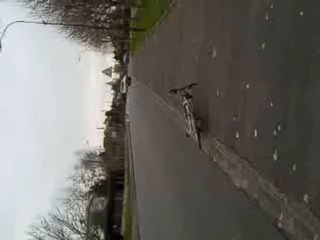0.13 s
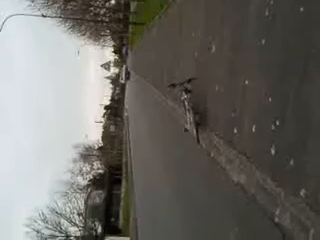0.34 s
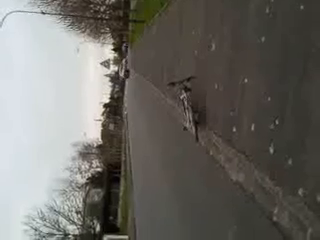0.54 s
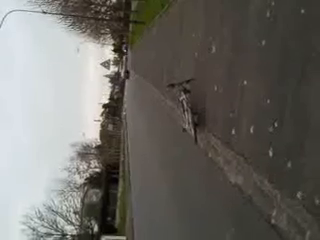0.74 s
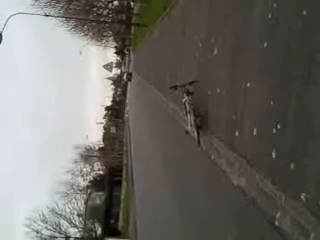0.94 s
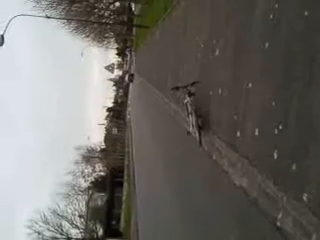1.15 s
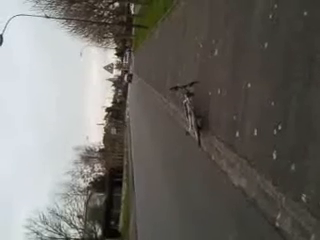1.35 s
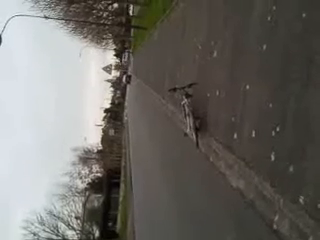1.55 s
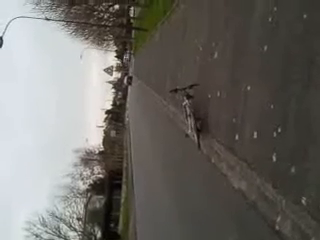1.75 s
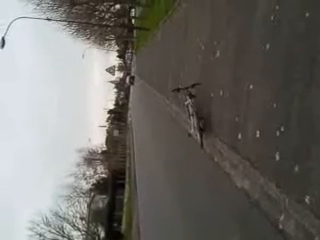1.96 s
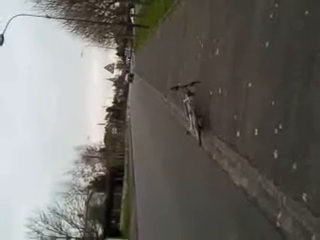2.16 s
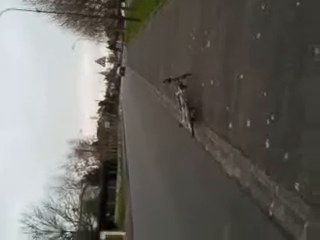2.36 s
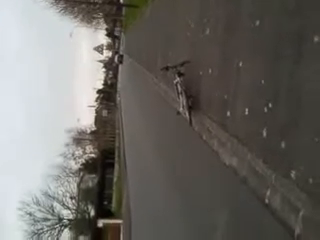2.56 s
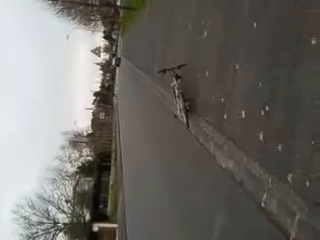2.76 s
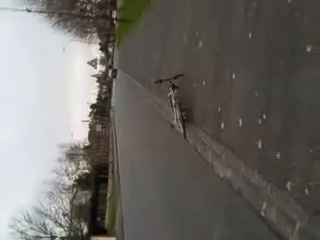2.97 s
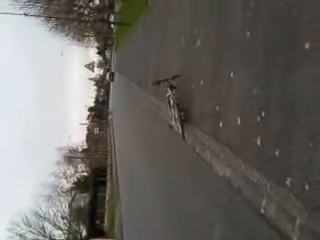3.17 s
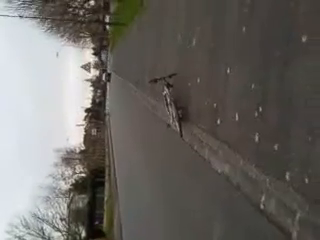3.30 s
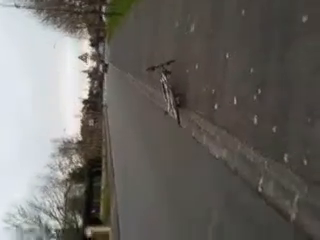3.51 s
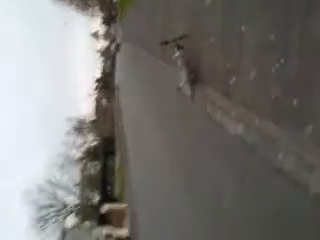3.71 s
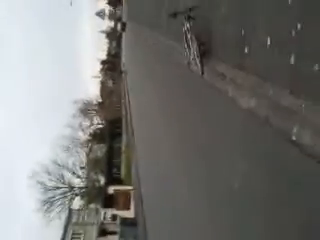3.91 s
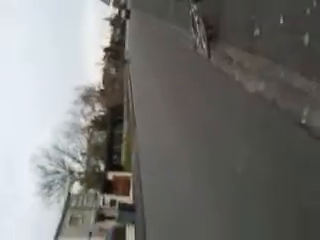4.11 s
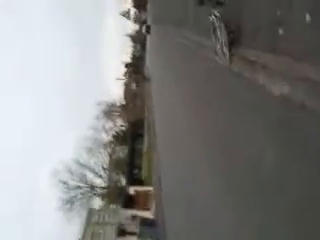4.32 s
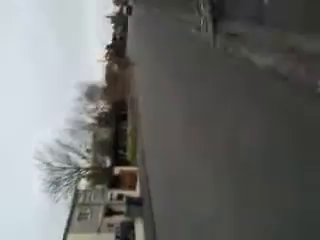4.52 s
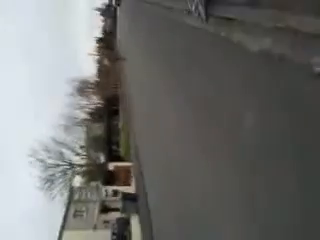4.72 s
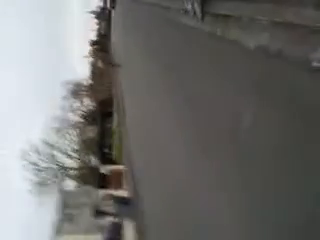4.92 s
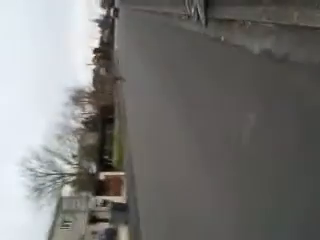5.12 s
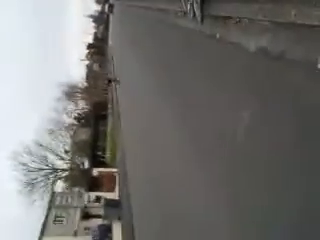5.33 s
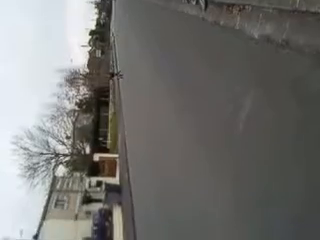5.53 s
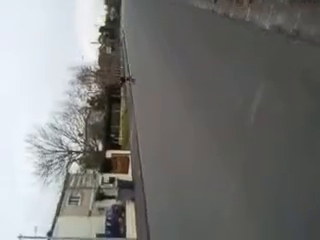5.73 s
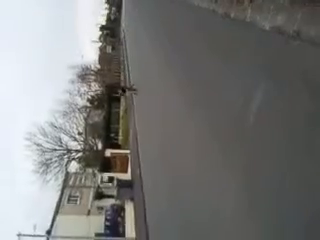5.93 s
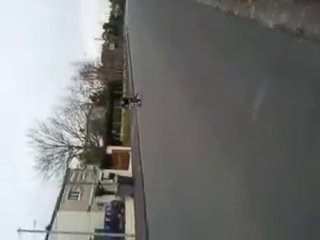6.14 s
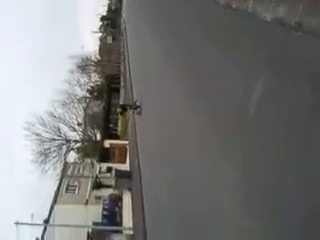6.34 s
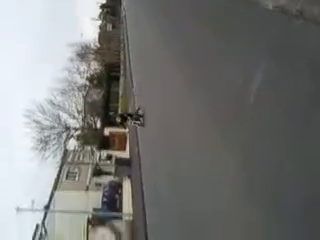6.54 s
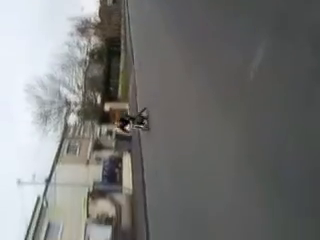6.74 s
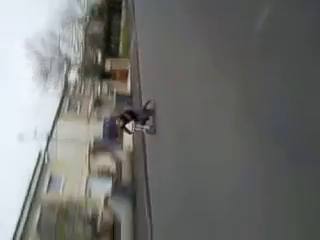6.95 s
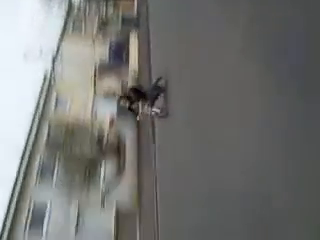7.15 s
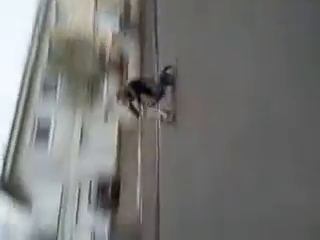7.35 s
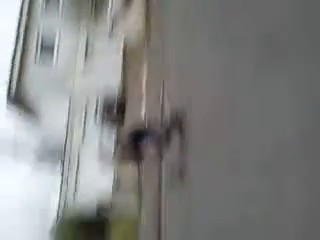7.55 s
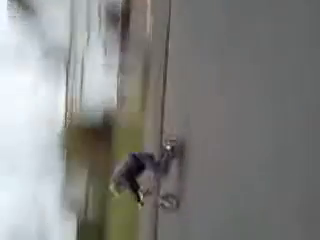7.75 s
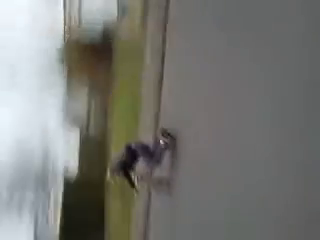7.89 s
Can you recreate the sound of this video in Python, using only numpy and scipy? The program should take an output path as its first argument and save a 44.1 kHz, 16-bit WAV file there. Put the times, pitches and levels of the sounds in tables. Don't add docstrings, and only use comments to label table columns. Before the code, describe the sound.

Outdoors on a residential street, a tiny two-stroke bike starts far off and accelerates nearer, its nasal exhaust buzz rising in pitch. A duller second engine idles, blips twice and winds down. The bike grows loud and tinny, stutters briefly on a lifted throttle, then rasps past with its pitch dropping slightly. Soft wind rumble and faint house echoes; narrow, telephone-like phone sound, distorting on loud firings.

```python
import sys
import numpy as np
from scipy import signal
from scipy.fft import rfft, irfft, next_fast_len
from scipy.io import wavfile

SR = 44100
rng = np.random.default_rng(int(sys.argv[2]) if len(sys.argv) > 2 else 0)


def inscribe(sig):
    pcm = np.round(np.clip(np.atleast_2d(sig).T, -1, 1) * 32767)
    wavfile.write(sys.argv[1], SR, pcm.astype(np.int16))


def ratio(d):
    e = np.asarray(d, float) / 20
    return 10 ** e


N = 355887


def evened(x):
    return x / np.sqrt(np.mean(x ** 2) + 1e-20)


def columns(rows):
    times, *values = np.transpose(rows)
    return [np.interp(np.arange(N) / SR, times, value) for value in values]


def ramp(start_s, takes_s):
    return np.clip((np.arange(N) / SR - start_s) / takes_s, 0, 1)


def bumps(rows):
    t = np.arange(N) / SR
    return sum(np.interp(t, [s - rise, s, s + fall], [0, size, 0]) for s, rise, fall, size in rows)


def wander(per_s):
    t = np.arange(N) / SR * per_s
    steps = rng.standard_normal(600)
    return np.interp(t, np.arange(len(steps)), steps) * np.sqrt(3 / 2)


def coloured(x, points):
    f, db = np.transpose(points)
    size = next_fast_len(len(x) + 4096)
    hz = np.fft.rfftfreq(size, 1 / SR)
    gain = ratio(np.interp(np.log(hz + 1), np.log(f + 1), db))
    return irfft(rfft(x, size) * gain, size)[:len(x)]


def resonate(x, hz, width):
    turn = np.exp(2j * np.pi * np.cumsum(hz * np.ones(N)) / SR)
    r = np.exp(-np.pi * width / SR)
    smooth = signal.lfilter([(1 - r) ** 2], [1, -2 * r, r * r], x / turn)
    return 2 * (turn * smooth).real


def focused(x, hz, focus, wide, narrow):
    focus = np.clip(focus, 0, 1)
    blurred = evened(resonate(x, hz, wide))
    sharp = evened(resonate(x, hz, narrow))
    return evened((1 - focus) * blurred + focus * sharp)


def body(x, modes):
    total = 0
    for k, (hz, width, db) in enumerate(modes):
        total = total + (-1) ** k * ratio(db) * resonate(x, hz, width)
    return evened(total)


def firings(hz, memory, spread_db, blowdown, jitter, catches=(), count=128):
    turns = np.cumsum(hz) / SR
    at = [round(s * SR) for s, db in catches]
    turns += 1 - (turns[at[0]] % 1 if at else 0)
    chance = rng.standard_normal((1200, count + 2))
    strength = ratio(spread_db * chance[:, -1])
    for k, (s, db) in zip(at, catches):
        strength[round(turns[k])] = ratio(db)
    phase = np.arange(count) / count
    bang = np.sinc(count * (phase - .04 - jitter * chance[:, -2:-1])) * strength[:, None]
    keep = np.clip(memory, 0, .95)
    gas = signal.lfilter([1], [1, -keep], chance[:, :count], axis=0)
    gas *= (0.19 + np.exp(-phase / blowdown)) * strength[:, None]
    place = (turns + 0.037) * count
    return [evened(np.interp(place, np.arange(c.size), c.ravel())) for c in (bang, gas)]


def mixed(bang, gas, rough):
    rough = np.clip(rough, 0, 1)
    return np.sqrt(1 - rough) * bang + np.sqrt(rough) * gas


# (frequency [Hz], width [Hz], level [dB])
PIPE_SKIRTS = [(835, 660, 7), (1280, 630, 6.5)]
PIPE_HZ, PIPE_ABEAM_HZ = 1001, -100
DIP_HZ, DIP_PAST_HZ, LIFT_HZ, LIFT_PAST_HZ = 573, 727, 420, 550


def pipe_note(drive, abeam, past, close, lifted):
    hz = PIPE_HZ + PIPE_ABEAM_HZ * abeam * (1 - past) - 30 * past + 90 * ramp(7.8, .25) + 30 * wander(5)
    focus = 0.02 + 0.36 * ramp(4.9, 0.38) + 0.46 * lifted + 0.061 * close
    focus = focus - 0.52 * abeam + .6 * past + 0.041 * wander(5.6)
    note = focused(drive, hz, focus, wide=620, narrow=260)
    dip_hz = DIP_HZ + (DIP_PAST_HZ - DIP_HZ) * past
    lift_hz = LIFT_HZ + (LIFT_PAST_HZ - LIFT_HZ) * past
    skirts = ratio(-16.0) * body(drive, PIPE_SKIRTS)
    pipe = note + skirts - ratio(-26 + 7 * past) * evened(resonate(drive, lift_hz, 280))
    depth = np.clip(0.27 + .2 * abeam + 0.14 * past, 0, 1)
    return evened(pipe - depth * resonate(pipe, dip_hz, 150))


# (multiple of the firing rate, width [Hz], level [dB])
THUMP_ORDERS = [(1, 212, 17), (2, 510, -3.5)]
# (time [s], fall [s], recovery [s], level [dB])
ECHO_FADES = [(1.3, 0.32, 0.9, -4.5), (1.88, 0.069, 0.22, -21), (2.31, 0.058, .08, -34.5),
              (2.6, 0.12, 0.028, -4), (4.25, 0.15, .19, -10), (4.84, .05, 0.15, -6.5),
              (5.55, .15, 0.23, -9.5), (5.91, 0.073, 0.12, -8.5), (6.5, 0.24, 0.28, -13),
              (7.03, 0.15, .1, -17), (7.62, 0.06, 0.19, -10.5)]
THUMP_DB, THUMP_ABEAM_DB, THUMP_PER_DB = -9.5, 2.5, -0.27


def thump(bang, gas, rough, hz, near_db, abeam, close):
    level_db = THUMP_DB + THUMP_ABEAM_DB * abeam + THUMP_PER_DB * np.maximum(near_db + 33.5, 0)
    level_db = level_db + 4 * close + bumps(ECHO_FADES) + 1.4 * wander(13)
    orders = [(k * hz, width, db) for k, width, db in THUMP_ORDERS]
    return ratio(level_db) * body(mixed(bang, gas, 0.81 * rough), orders)


# (frequency [Hz], width [Hz], level [dB])
OVERTONE_SKIRTS = [(1594, 216, 35.5), (1990, 1500, -25.5)]
# (time [s], rise [s], fall [s], level [dB])
OVERTONE_SWELLS = [
    (2.4, 0.51, 2.3, 6),
    (4.199, 1.8, 0.25, 5.9),
    (4.75, 0.76, .7, 4.5),
    (6.7, .06, 0.44, 3.8),
]
OVERTONE_HZ, OVERTONE_TURNED_HZ, OVERTONE_DRIFT_HZ = 1744, -130, 22
OVERTONE_DB, OVERTONE_PER_DB, OVERTONE_FLICKER_DB = -7.5, -0.38, 1.2


def pipe_overtone(bang, gas, rough, near_db, turned, lifted):
    level_db = OVERTONE_DB + OVERTONE_PER_DB * (near_db + 34) + bumps(OVERTONE_SWELLS)
    level_db = level_db - 6 * lifted + OVERTONE_FLICKER_DB * wander(16)
    hz = OVERTONE_HZ + OVERTONE_TURNED_HZ * (turned - 0.83 * ramp(5.2, 0.57))
    hz = hz + OVERTONE_DRIFT_HZ * wander(4.3)
    hiss = mixed(bang, gas, 1.1 * rough)
    note = evened(resonate(hiss, hz, 130))
    return ratio(level_db) * evened(note + ratio(-.8) * body(hiss, OVERTONE_SKIRTS))


# (time [s], rise [s], fall [s], level [dB])
ECHO_SWELLS = [(1.69, 0.032, 0.09, 1.5), (4.4, 0.17, .15, -2), (5.4, .2, 0.19, 1), (5.79, 0.019, 0.046, 1),
               (5.5, .06, .08, 1.5), (5.68, 0.044, 0.053, 3), (5.89, .07, 0.046, 3),
               (6.07, 0.045, 0.09, 0.5), (6.24, 0.046, 0.057, -4), (6.3, 0.033, 0.053, 3),
               (6.53, 0.027, .08, -15.5), (6.62, 0.052, 0.064, -12), (6.67, 0.022, 0.021, 2.5),
               (6.715, 0.015, .02, -7), (6.4, 0.054, .03, -0.5), (6.48, .04, 0.018, -0.5),
               (6.78, .05, .09, -2.5), (6.92, 0.074, 0.097, 2.5), (7.27, 0.18, 0.23, -3),
               (7.65, 0.13, .12, 3.5), (7.9, .06, .1, 0.5), (8.04, 0.06, .03, -5.5)]
CRUISE_HZ = 148.6
RING_AWAY_HZ, RING_FACING_HZ = 2842, 3332
RING_DB, RING_TURNED_DB, RING_CLOSE_DB, RING_ABEAM_DB, RING_FLICKER_DB = 0.5, -5, 6, 5.5, 1.0
TIN_ROUGH, TIN_SETTLES = .45, .2


def tin_ring(bang, gas, rough, speed_hz, turned, abeam, past, close):
    in_view = ramp(6.76, .16)
    level_db = RING_DB + RING_TURNED_DB * turned + RING_CLOSE_DB * in_view + RING_ABEAM_DB * abeam
    level_db = level_db - 0.13 * bumps(ECHO_SWELLS) + RING_FLICKER_DB * wander(17)
    doppler = 1 + close * (speed_hz / CRUISE_HZ - 1)
    hz = RING_AWAY_HZ + 80 * ramp(2.7, .8) * (1 - turned) + (RING_FACING_HZ - RING_AWAY_HZ) * turned
    hz = hz * doppler + 70 * past + 60 * (1 - .5 * turned) * wander(7)
    focus = .27 - 0.13 * ramp(3.0, 0.64) + 0.2 * turned + 0.29 * close
    focus = focus - 0.4 * abeam + 0.069 * past + 0.1 * wander(5)
    rattle = mixed(bang, gas, TIN_ROUGH + rough - TIN_SETTLES * close)
    return ratio(level_db) * focused(rattle, hz, focus, wide=1050, narrow=238)


# (time [s], firing rate [Hz])
BIKE_SPEED = [(0.09, 82.1), (0.42, 87.7), (0.97, 94.88), (1.2, 97.85), (1.71, 108.7), (1.85, 107.3),
              (2.35, 116.4), (2.74, 125), (3.07, 126), (3.31, 129.9), (3.69, 131.2), (4.2, 137.8),
              (4.64, 141), (5.3, 147.8), (6.02, 147), (6.3, 143.7), (7.18, 143.1), (8.07, 136)]
# (time of the bottom or top [s], run-in [s],
# recovery [s], change [Hz])
REV_SAGS = [(2.55, .2, .18, -7), (2.84, .09, .16, -2.5), (3.15, .08, .16, -5), (4.26, 0.052, .14, -3.5),
            (4.51, .07, .13, -0.1), (5.56, .16, 0.072, -3), (6.58, .11, 0.088, -5), (6.69, 0.027, 0.062, 7),
            (6.84, 0.18, 0.082, -3.65), (7.22, 0.067, 0.06, -0.5), (7.88, 0.16, 0.14, -2)]
# (time [s], level [dB])
APPROACH = [(0.09, -41), (0.6, -37.5), (1.0, -34.5), (1.6, -31), (1.91, -30.5), (2.4, -30.5), (2.6, -29.5),
            (3.5, -27), (3.65, -26), (4.2, -26.5), (4.44, -23), (4.8, -24), (5.38, -20), (5.58, -17),
            (5.89, -14.5), (6.49, -14.5), (6.89, -11.5), (8.07, -10.5)]
# (time [s], level [dB])
LATE_CATCHES = [
    (6.546, 11),
    (6.567, 6),
    (6.581, 7),
    (6.596, 7),
    (6.611, 3),
    (6.653, 5),
    (6.723, 1),
]
# (time [s], rise [s], fall [s], share [0-1])
THROTTLE_SHUT = [
    (6.58, .1, .08, 0.66),
]
# (time [s], rise [s], fall [s], share [0-1])
SIDE_ON = [
    (7.42, 0.44, 0.51, 1),
]
ROUGH_FAR, ROUGH_TURN, ROUGH_NEAR, ROUGH_ABEAM = .42, .3, .12, .14
CLEAR_S, CLEAR_TAKES_S = 4.3, .5
PIPE_ABEAM_DB = -2


def bike():
    speed_hz, near_db = columns(BIKE_SPEED)[0], columns(APPROACH)[0]
    hz = speed_hz + bumps(REV_SAGS)
    turned = ramp(4.2, .16)
    past = ramp(7.5, 0.21)
    close = ramp(5.744, 1.0)
    abeam, lifted = bumps(SIDE_ON), bumps(THROTTLE_SHUT)
    rough = ROUGH_FAR + (ROUGH_TURN - ROUGH_FAR) * ramp(0, CLEAR_S)
    rough = rough + (ROUGH_NEAR - ROUGH_TURN) * ramp(CLEAR_S, CLEAR_TAKES_S)
    rough = rough + ROUGH_ABEAM * abeam - .07 * lifted - .04 * past
    bang, gas = firings(hz, memory=.66, spread_db=1.0, blowdown=0.85, jitter=0.0057, catches=LATE_CATCHES)
    sound = pipe_note(mixed(bang, gas, rough), abeam, past, close, lifted)
    sound = sound + thump(bang, gas, rough, hz, near_db, abeam, close)
    sound = sound + pipe_overtone(bang, gas, rough, near_db, turned, lifted)
    sound = sound + tin_ring(bang, gas, rough, speed_hz, turned, abeam, past, close)
    level_db = near_db + bumps(ECHO_SWELLS) + PIPE_ABEAM_DB * abeam + 0.36 * wander(14)
    return -ratio(level_db) * sound


# (time [s], firing rate [Hz], level [dB])
FAR_REVS = [(0.09, 71.1, -39), (0.5, 72.55, -38), (1.25, 71.2, -42), (1.39, 77.2, -35.5),
            (1.52, 95.9, -34.5), (1.7, 100.9, -37.5), (1.78, 98.3, -37), (1.93, 85.8, -40), (2.1, 96, -29),
            (2.22, 98.06, -31.5), (2.36, 87.8, -49.5), (2.58, 79, -49.5), (2.74, 77.3, -35.5),
            (4.07, 80.85, -33.5), (4.36, 78.2, -34), (4.62, 64.8, -44), (5.0, 46.6, -37.5),
            (5.3, 45, -38.5)]
# (frequency [Hz], width [Hz], level [dB])
FAR_EXHAUST = [(99, 230, 3.5), (252, 150, -5), (335, 140, -12), (419.8, 71, 12), (602, 149, 10),
               (760, 230, -6)]
# (frequency [Hz], width [Hz], level [dB])
FAR_RASP_MODES = [(2157, 260, 2.5), (2700, 400, 3)]
RASP_SHUT_DB, RASP_OPEN_DB, RASP_FROM_HZ, RASP_FULL_HZ = -17.5, 2.5, 80, 93.7


def far_engine():
    hz, level_db = columns(FAR_REVS)
    rasp_db = np.interp(hz, [RASP_FROM_HZ, RASP_FULL_HZ], [RASP_SHUT_DB, RASP_OPEN_DB])
    bang, gas = firings(hz, memory=0.54, spread_db=1.0, blowdown=0.32, jitter=0.006)
    drive = mixed(bang, gas, 0.39)
    fade = np.clip((FAR_REVS[-1][0] - np.arange(N) / SR) / 0.64, 0, 1)
    purr = ratio(-14.0 - 0.25 * rasp_db) * evened(resonate(bang, 221, 120))
    sound = purr + body(drive, FAR_EXHAUST) + ratio(rasp_db) * body(drive, FAR_RASP_MODES)
    return fade * ratio(level_db + 0.85 * wander(8)) * sound


def walls(x):
    t = np.arange(SR // 3) / SR
    signs = rng.choice([-1., 1.], len(t))
    sparse = rng.random(len(t)) < 2000 / SR
    taps = signs * sparse * ratio(-60 * t / 0.83) * (t > .004)
    return signal.fftconvolve(x, taps / np.linalg.norm(taps))[:N]


# (frequency [Hz], level [dB per Hz])
STREET_COLOUR = [(18, -33), (30, -34.5), (136, -11.5), (314, -6), (421, -21.5), (509, -12), (565, -13),
                 (1680, -11), (2840, -6), (4500, -13.5), (5850, -77.5), (9900, -120)]
# (time [s], rise [s], fall [s], level [dB])
AIR_GUSTS = [
    (.75, .15, .1, 5),
    (1.29, 0.1, .4, 12),
    (2.0, .15, .6, 16.5),
    (3.58, 0.26, .1, 11),
    (5.36, 0.37, .13, 2),
    (7.38, 0.16, .3, 4.5),
    (7.82, 0.067, .2, 14.5),
]
STREET_DB, RUSH_CALM_DB, RUSH_PER_DB = -40.5, -53, 0.47


def street():
    wash = ratio(STREET_DB) * evened(coloured(rng.standard_normal(N), STREET_COLOUR))
    low = [(12, -43.0), (30, -10.0), (70, -13), (110, -8), (200, -55.5)]
    rumble = evened(coloured(rng.standard_normal(N), low))
    rush_db = RUSH_CALM_DB + RUSH_PER_DB * (columns(APPROACH)[0] + 29.5) + bumps(AIR_GUSTS)
    return wash + ratio(rush_db) * rumble


def scene():
    engines = bike() + far_engine()
    return (engines + ratio(-12.5) * walls(engines) + street())[None]


# (frequency [Hz], level [dB])
PHONE_BAND = [(20, -17.5), (80, -4.5), (150, 3.5), (3400, 1), (3750, -6), (4000, -13), (4300, -15.5),
              (4600, -34), (4900, -100)]
START_S, OVERLOAD, CLIP = 0.081, 0.69, .735


def phone_input(sound):
    knee = sound / (1 + (sound / OVERLOAD) ** 4) ** (1 / 4)
    narrow = coloured(knee * ramp(START_S, 0.013), PHONE_BAND)
    return np.clip(narrow, -CLIP, CLIP)[None]


def low_pass(x):
    return signal.sosfilt(signal.butter(12, 15950, fs=SR, output="sos"), x)


def record(dry):
    mix = phone_input(dry[0])
    return low_pass(mix)


dry = scene()
out = record(dry)
inscribe(out)
```